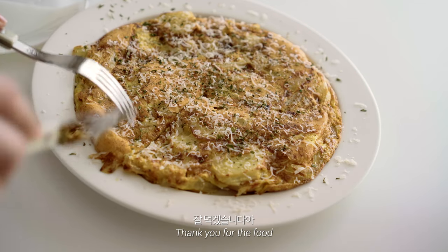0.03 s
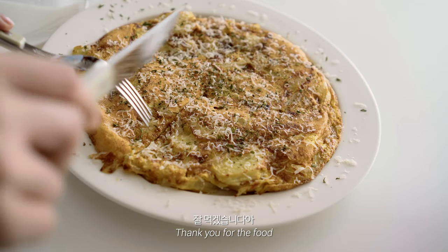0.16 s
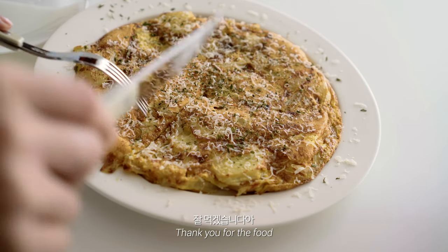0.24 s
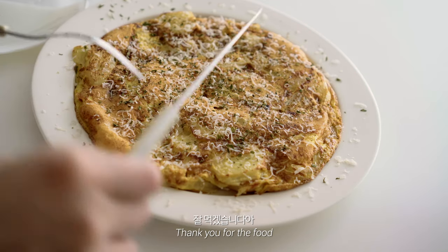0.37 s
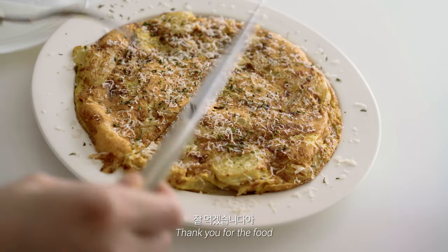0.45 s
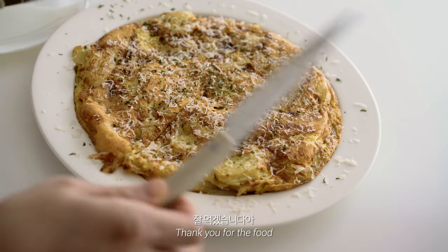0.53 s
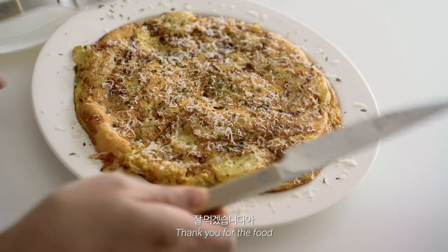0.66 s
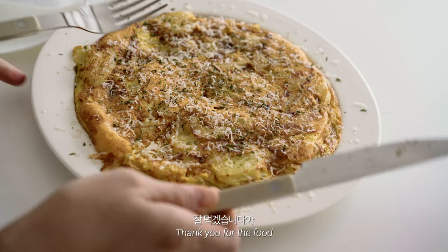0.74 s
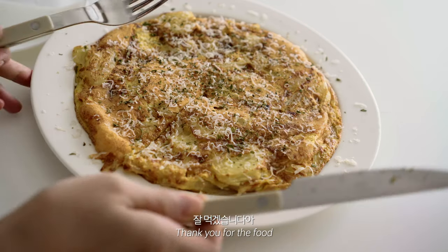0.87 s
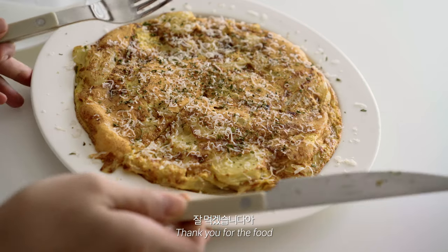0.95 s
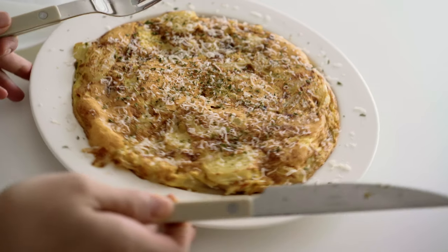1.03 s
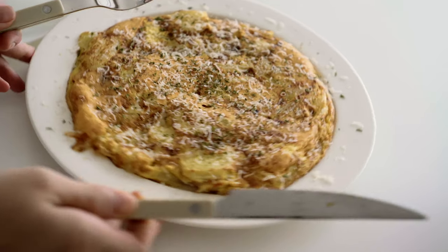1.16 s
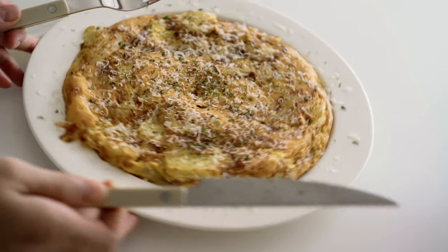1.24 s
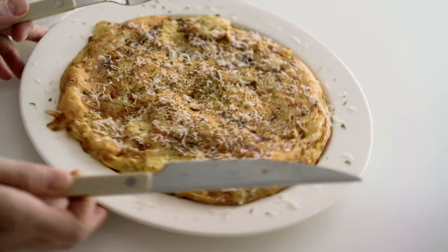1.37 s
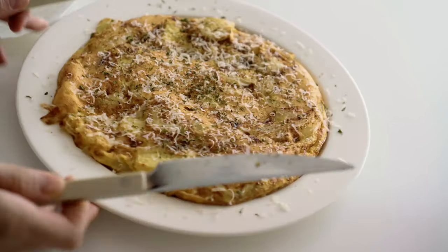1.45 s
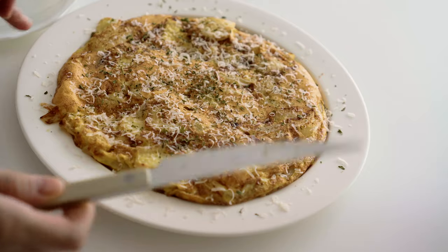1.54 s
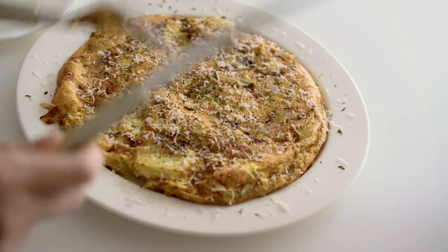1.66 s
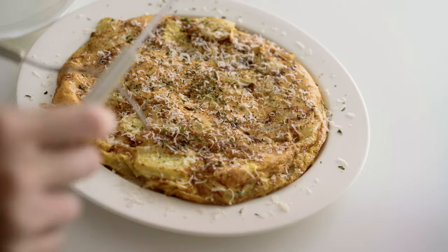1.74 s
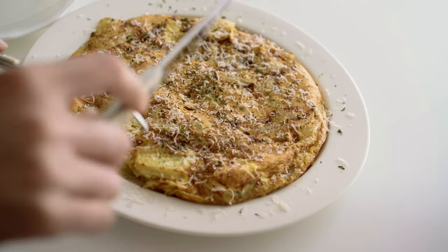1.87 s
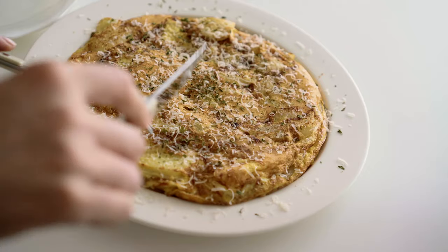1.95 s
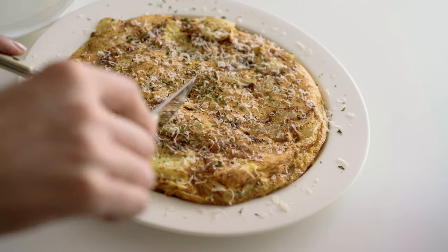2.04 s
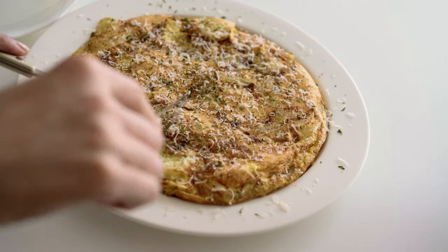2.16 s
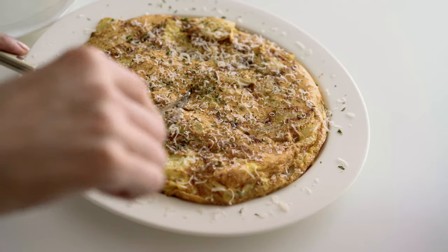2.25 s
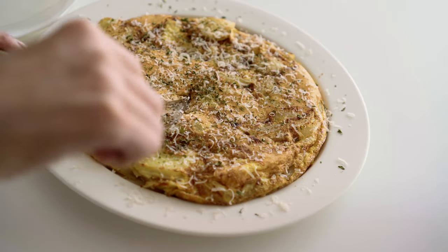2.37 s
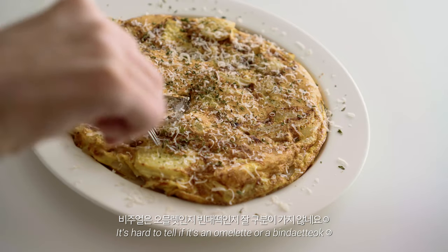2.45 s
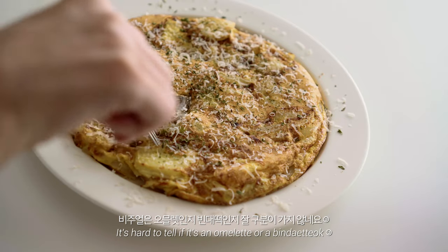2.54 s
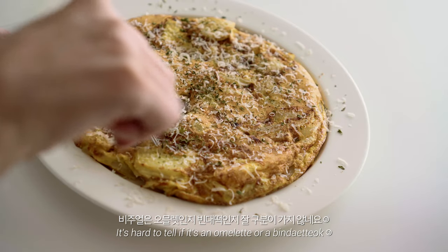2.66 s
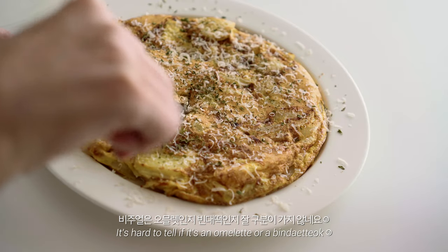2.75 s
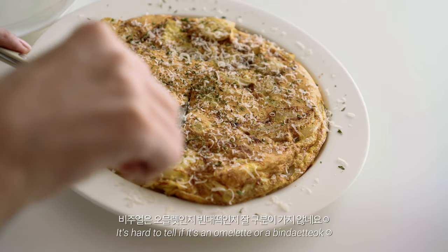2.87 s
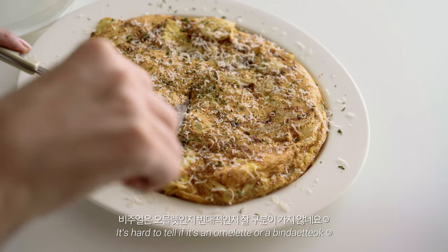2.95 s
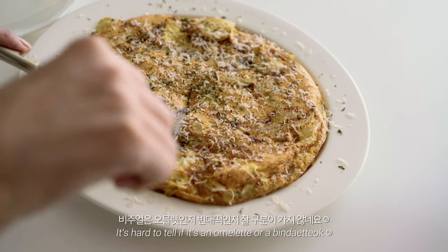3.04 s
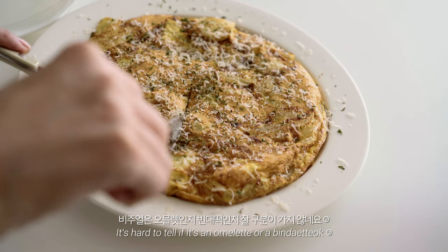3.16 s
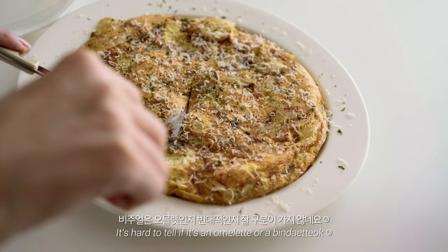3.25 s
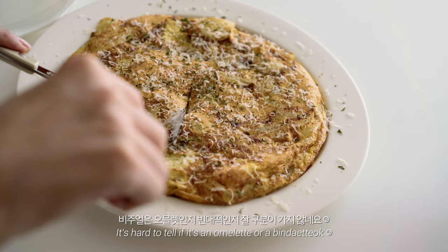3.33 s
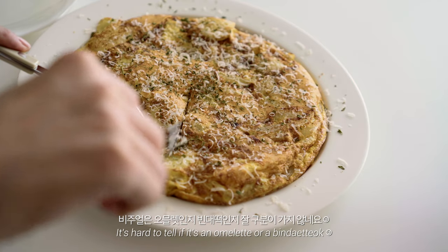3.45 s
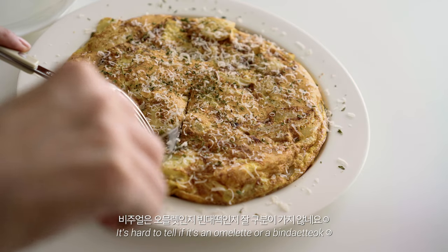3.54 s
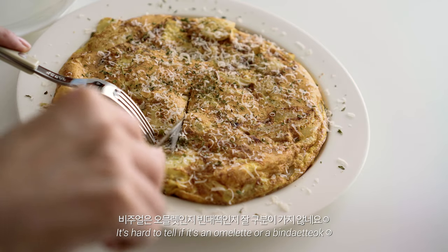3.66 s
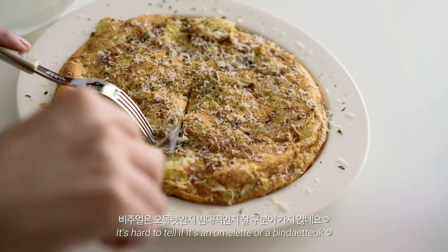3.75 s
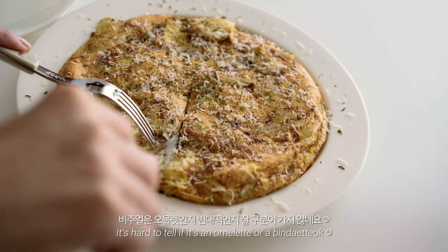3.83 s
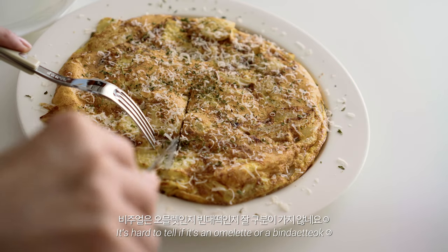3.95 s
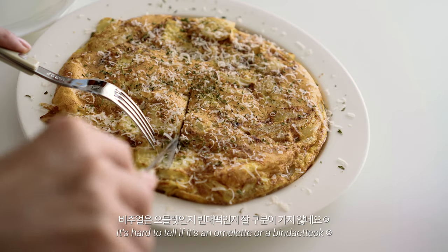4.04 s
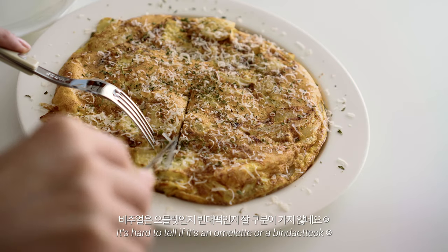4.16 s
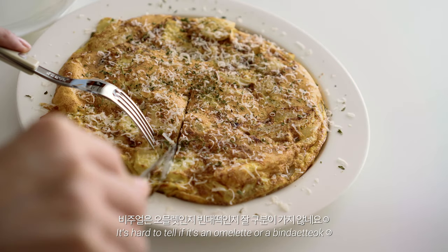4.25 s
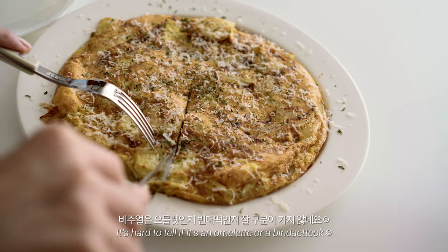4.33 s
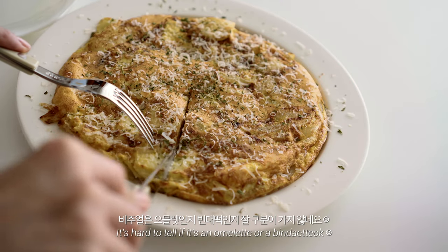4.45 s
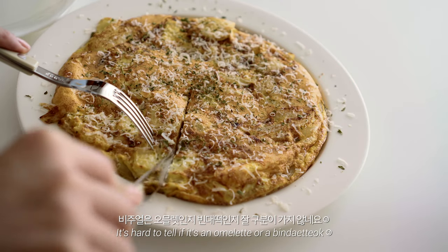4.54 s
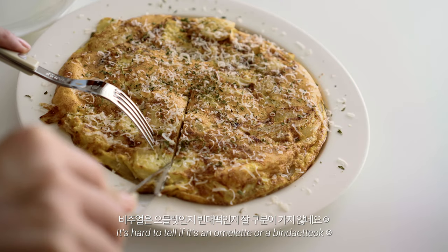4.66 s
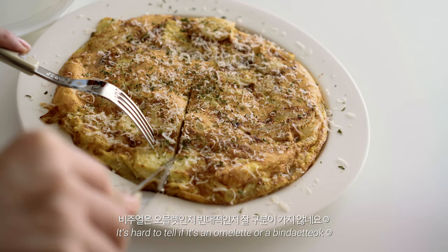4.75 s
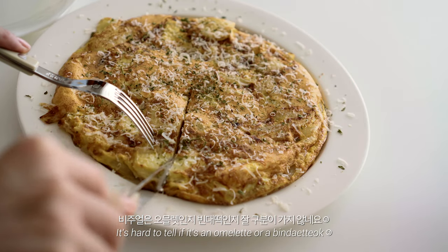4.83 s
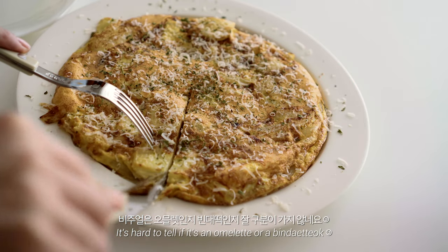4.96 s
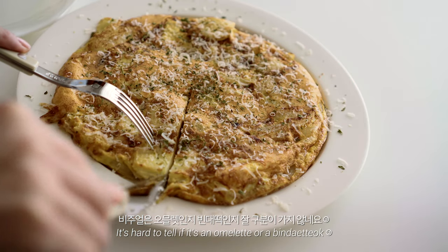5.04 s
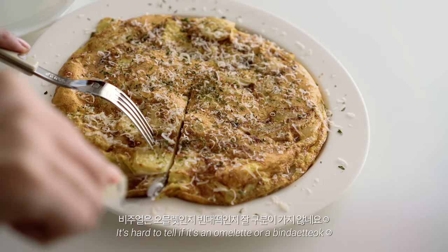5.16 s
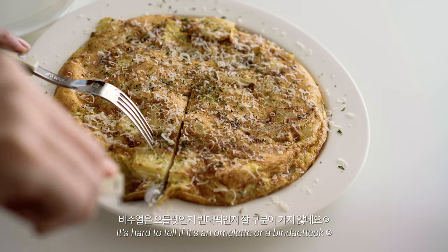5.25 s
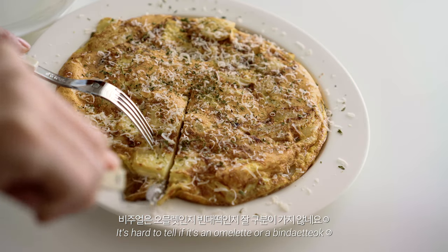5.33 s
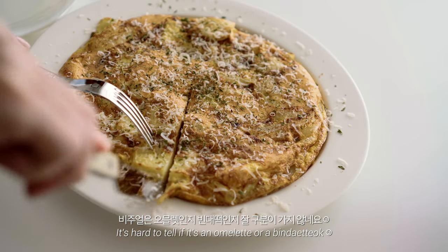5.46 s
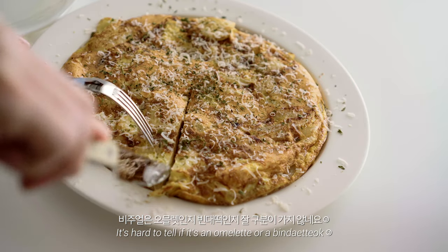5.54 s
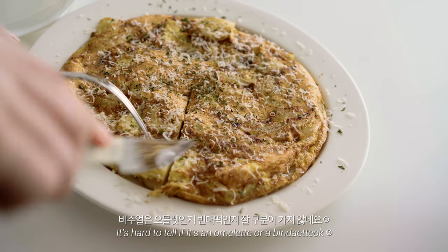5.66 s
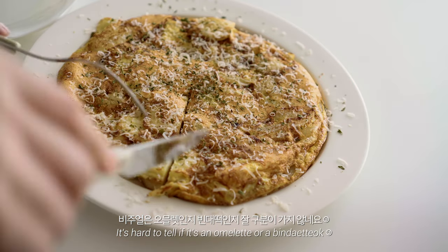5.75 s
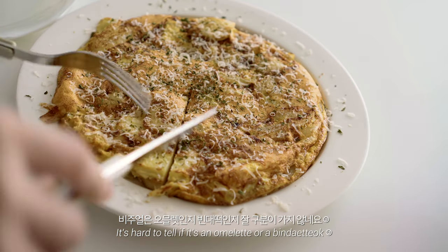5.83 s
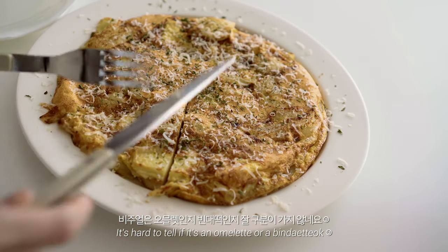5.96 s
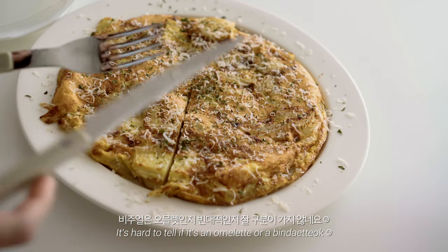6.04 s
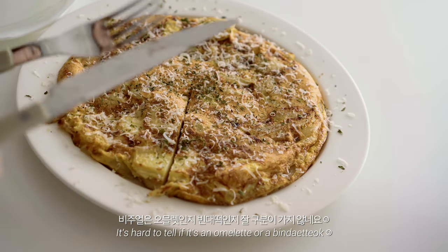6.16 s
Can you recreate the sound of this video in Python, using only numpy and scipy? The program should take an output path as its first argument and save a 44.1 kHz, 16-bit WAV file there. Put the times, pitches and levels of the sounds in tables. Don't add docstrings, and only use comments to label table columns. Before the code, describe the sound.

A steel knife saws through food on a china plate in short scraping strokes, after a dragging plate scrape, ending in bright clinks.

```python
import sys
import numpy as np
from scipy import signal
from scipy.fft import rfft, irfft
from scipy.io import wavfile
from scipy.ndimage import uniform_filter1d

SR = 44100
rng = np.random.default_rng(int(sys.argv[2]) if len(sys.argv) > 2 else 0)


def volts_from_decibels(level):
    exponent = np.asarray(level, float) / 20
    return 10 ** exponent


def waveform_to_disk(signal):
    frames = np.transpose(np.atleast_2d(signal))
    scaled = np.clip(frames, -1, 1) * 32767
    samples = np.round(scaled).astype(np.int16)
    wavfile.write(sys.argv[1], SR, samples)


N = 273420

# pitch_hz, level_db (per Hz)
HUSH = [(41, -19), (70, -18), (77, -6), (226, -5), (392, -9.5), (420, -3), (450, -9), (916, -12.5),
        (1130, -11), (1290, -11.5), (1870, -15), (15100, -14.5), (16900, -7)]
# pitch_hz, width_hz, level_db
HUM_BANDS = [(27.2, 20, -58), (54.5, 21, -60), (226, 18, -63), (434, 15, -70), (362.6, 14, -67),
             (1122, 48, -59.5), (13400, 4300, -51.5)]
# pitch_hz, likeness (0 to 1)
LIKENESS = [(30, 0.44), (100, 0.32), (400, 0.43), (1200, 0.32), (3000, 0.1), (6000, 0.017), (16000, 0.013)]
# start_s, peak_db, pitch_hz, width_hz, t60_s
CRACKS = [(0., -34.5, 716, 910, 0.31), (1.080, -26, 3160, 900, 0.02), (1.086, -31, 4930, 600, 0.018),
          (3.64, -29, 1500, 1500, .005), (3.81, -39, 9000, 8000, .006), (3.935, -40, 5500, 3040, .004),
          (4.945, -22.5, 2200, 500, .015), (5.262, -30, 2140, 400, 0.018),
          (2.591, -21.5, 1700, 700, 0.0096), (2.593, -19, 7500, 5000, .005),
          (2.592, -27, 4200, 1500, 0.012), (2.594, -35.5, 139, 79.4, 0.16), (2.593, -30.5, 420, 304, .1),
          (2.941, -23, 1730, 710, 0.0076), (2.938, -17.5, 9000, 9000, 0.0044), (2.939, -50, 140, 80, .12),
          (3.046, -34, 1590, 500, 0.023), (3.061, -35, 2880, 900, .006), (3.281, -20.5, 1620, 900, 0.0095),
          (3.282, -12.5, 7000, 12000, 0.005), (3.284, -48, 169, 80, 0.085), (3.41, -31.5, 1500, 500, 0.057),
          (3.655, -20.5, 1360, 910, 0.025), (3.652, -14, 7950, 12000, 0.012), (3.655, -41, 140, 80, 0.084),
          (3.654, -31.5, 370, 300, 0.31), (3.805, -37, 3740, 397, 0.044), (3.791, -33, 1460, 500, 0.028),
          (3.903, -25, 4870, 2500, 0.0051), (3.908, -30, 10000, 3000, .004),
          (4.102, -27, 8000, 6000, 0.0054), (4.101, -29, 1530, 800, .012), (4.205, -37.5, 1320, 300, 0.025),
          (4.418, -23, 7500, 6000, 0.0067), (4.419, -35.5, 205, 81, 0.13),
          (4.746, -16.5, 5900, 10000, 0.0075), (5.098, -33, 6000, 8000, .006),
          (5.303, -28, 8900, 6000, 0.0087), (5.311, -27, 11000, 3000, .006),
          (5.3254, -6, 2600, 714, 0.0095), (5.326, -22.5, 577, 690, 0.048), (5.325, -23, 9000, 7960, .008),
          (5.385, -36, 7300, 1500, .012), (5.385, -32, 790, 900, 0.034), (5.444, -17, 2450, 900, 0.014),
          (5.444, -31.5, 684, 900, 0.042), (5.492, -37, 6000, 5000, .005),
          (5.524, -20.5, 1600, 1200, 0.0098), (5.529, -29.5, 10200, 2000, 0.0096),
          (5.549, -32, 1500, 1210, .015), (5.548, -32, 590, 700, 0.056)]
# start_s, peak_db, scrape_db
FADING_CLINK = (0., -29.5, -2)
# pitch_hz, level_db, t60_s
FADING_TONES = [(2551, -1, 0.089), (2620, -4, 0.1), (1520, -2, 0.081), (3500, -11, 0.11), (1880, -2, 0.058),
                (2300, -8, .05)]
# start_s, low_db, 2khz_db, 4khz_db, 8khz_db
DRAGS = [
    [(1.04, -50.5, -56, -69, -64), (1.126, -37.5, -41, -54, -61), (1.246, -42, -37, -55, -56),
     (1.296, -46, -38.5, -46, -52), (1.348, -41, -37.5, -46.5, -52), (1.478, -47, -42.5, -56, -60),
     (1.56, -58, -58, -74, -73)],
    [(5.25, -62, -61, -59, -69), (5.328, -44.5, -47, -58, -53), (5.428, -46.5, -60, -71, -74),
     (5.466, -46.5, -51, -63, -64), (5.558, -45.5, -73, -74, -57), (5.64, -59, -55, -67, -71)],
]
# pitch_hz, level_db (per Hz)
TABLE_RUMBLE = [(59, -47), (100, -17.5), (473, 0.5), (611, -6.5), (820, -5), (1990, -4.5), (2470, -6.5),
                (2780, -12), (3590, -2), (4200, -13.5), (11000, -21), (14300, -55), (22000, -120)]
# pitch_hz, level_db, t60_s
HELD_PLATE = [
    [(2525, 1, 0.056), (3060, -5, .06), (1380, -11.5, 0.064)],
    [(911, -1.5, 0.037), (818, 10.5, 0.031), (550, -3, .05), (369, 2.5, 0.066), (212, -0.5, 0.058)],
    [(3620, 3, 0.079), (4920, -2.5, 0.055), (3500, -4, 0.079)],
    [(6200, 0, 0.033), (7280, -4, .03), (9170, -2, .02)],
]
# start_s, peak_db of each held plate group (four columns), scrape_db
JOLTS = [
    (1.0859, -17, -26, -30, -33, -25),
    (1.134, -39, -24, -41, -48, -25),
    (1.1722, -21, -32, -34, -51, -20),
    (1.2038, -37, -22.5, -44, -53, -25),
    (1.2299, -24, -21, -30.5, -46, -25),
]
# start_s, length_s, level_db of the first four rim groups and the squeal (five columns)
GLINTS = [
    (1.25, .03, -65, -60, -52, -75, -44),
    (1.32, 0.027, -35, -52, -43.5, -75, -45),
    (1.39, 0.024, -48, -60, -43, -75, -70),
    (1.435, 0.049, -51, -58, -44, -75, -70),
    (5.6, .03, -44, -47, -70, -70, -75),
    (5.68, .08, -58, -58, -75, -75, -75),
]
# pitch_hz, level_db, t60_s
SQUEAL = [(8350, 0, 0.046), (7140, -7, .04)]
# pitch_hz, level_db, t60_s
RIM = [
    [(2406, 0, .05), (2418, -17, .2)],
    [(2515, 0, .1), (2611, -1, .12), (1464, -2, .15), (1740, -12, .05)],
    [(3515, 0, .11)],
    [(4686, 0, .12)],
    [(5852, 0, .1), (7017, -1, .11), (8215, -1, .1), (9760, -6, .04), (11170, -10, .03)],
]
# start_s, peak_db of each rim group (five columns)
CLINKS = [
    (1.5763, -42, -48, -45, -61, -52),
    (5.3248, -23, -26, -27, -32, -31.5),
    (5.3857, -29.5, -39, -43, -39, -50),
    (5.444, -28.5, -36, -35, -32, -49),
    (5.4924, -27.5, -36, -34.5, -35, -47),
    (5.5234, -34, -32, -26, -51, -39),
    (5.5278, -14.5, -18, -30, -37, -42),
    (5.5488, -13, -40, -32, -26, -31),
]
# pitch_hz, level_db, t60_s
BLADE = [
    [(2042, 0, .05), (2240, -1, .055), (2140, -4, .05), (2350, -7, .04), (1900, -14, .025)],
    [(370, -8, .05), (424, -3, .08), (540, -7, .05), (650, -3, .06), (730, -1, .07), (775, -1, .06),
     (850, -6, .05)],
    [(4512, 0, .05), (4655, 0, .055), (5300, -18, .015)],
    [(7844, -2, .04), (7756, -5, .035), (7150, -3, .014), (7400, -4, .014), (9100, -14, .015),
     (11600, -12, .015)],
]
# start_s, 2khz_db, low_db, 4khz_db, 8khz_db (peaks), scrape_db
PUSHES = [
    (2.593, -28, -23.5, -37, -31, -9.5),
    (2.939, -27, -22, -35, -20, -8),
    (3.281, -20.5, -19, -23, -19, -10),
    (3.654, -12, -19, -13.5, -14, -14.5),
    (4.101, -21, -24.5, -28.5, -27, -14),
    (4.418, -18.5, -25.5, -29, -22, -12.5),
    (4.746, -18.5, -24, -38, -19, -12),
    (5.098, -26.5, -31, -27.5, -40, -13),
]
# start_s, length_s, 2khz_db, low_db, 4khz_db, 8khz_db
PULLS = [(2.673, 0.016, -47.5, -46, -62, -62), (3.045, 0.03, -45.5, -48.5, -55, -49),
         (3.415, 0.054, -45.5, -50.5, -52, -53), (3.802, 0.046, -33, -48, -39.5, -41.5),
         (3.864, 0.082, -51, -52, -64, -62), (4.2, 0.054, -43.5, -45, -50, -60),
         (4.586, 0.048, -39, -45, -52, -53), (4.807, 0.1, -45, -44, -57, -64),
         (4.925, 0.036, -42, -44, -56, -50), (4.951, 0.029, -35.5, -45, -45.5, -38),
         (5.014, .06, -47.5, -77.5, -67, -64), (5.267, 0.037, -38.5, -45, -42.5, -44.5),
         (5.307, 0.024, -29.5, -41.5, -35, -36)]


def evened(x):
    return x / np.sqrt(np.mean(x ** 2) + 1e-20)


def read(points, hz):
    f, value = np.transpose(points)
    return np.interp(np.log(hz + 1), np.log(f + 1), value)


def add(mix, s, sound):
    part = mix[..., round(s * SR):][..., :sound.shape[-1]]
    part += sound[..., :part.shape[-1]]


def ring(modes):
    t = np.arange(SR // 6) / SR
    out = 0
    for hz, db, t60 in modes:
        out = out + volts_from_decibels(db - 60 * t / t60) * np.sin(2 * np.pi * hz * t)
    return out / abs(out).max()


def grit(count, per_s, spread_db):
    size = volts_from_decibels(spread_db * np.minimum(rng.exponential(1, count), 4))
    size = size * rng.choice([-1., 1.], count)
    happens = rng.random(count) < per_s / SR
    return evened(size * happens)


def blows(rows, modes, contact_s, scrape_t60):
    force, t = np.zeros((len(modes), N)), np.arange(SR // 4) / SR
    for s, *group_db, scrape_db in rows:
        chatter = 0.16 * rng.standard_normal(len(t)) * np.exp(-t / contact_s)
        chatter[0] = 1
        scrape = volts_from_decibels(scrape_db - 24 - 60 * t / scrape_t60) * grit(len(t), 8000, 2.5)
        add(force, s, volts_from_decibels(np.array(group_db))[:, None] * (chatter + scrape))
    return sum(signal.oaconvolve(f, ring(m))[:N] for f, m in zip(force, modes))


def rubbed(level, modes, per_s, spread_db):
    ticks = grit(N, per_s, spread_db)
    out = np.zeros(N)
    for group_level, group in zip(level, modes):
        answer = ring(group)
        out += signal.oaconvolve(group_level * ticks, answer / np.linalg.norm(answer))[:N]
    return out


def brushes(rows, modes):
    t, level = np.arange(N) / SR, np.zeros((len(modes), N))
    for s, length, *group_db in rows:
        swell = np.exp(-8 * ((t - s) / length) ** 2)
        level += volts_from_decibels(np.array(group_db))[:, None] * swell
    return rubbed(level, modes, 5000, 2.6)


def kitchen():
    hush_db, edge_hz = -45, 16000
    frames, hz = N // 1024 + 5, np.fft.rfftfreq(4096, 1 / SR)
    a, b, c, d = rng.standard_normal((frames, len(hz), 4)).T
    same = np.clip(read(LIKENESS, hz), -1, 1)[:, None]
    left = a + 1j * b
    right = same * left + np.sqrt(1 - same ** 2) * (c + 1j * d)
    power = volts_from_decibels(2 * read(HUSH, hz)) * (hz < edge_hz)
    power = volts_from_decibels(2 * hush_db) * power / power.sum()
    for f, width_hz, db in HUM_BANDS:
        band = np.exp(-4 * ((hz - f) / width_hz) ** 2) * (hz < edge_hz)
        power = power + volts_from_decibels(2 * db) * band / band.sum()
    lean = volts_from_decibels(np.array([-1.2, 1.2])[:, None] / (1 + hz / 500))
    spectrum = np.array([left, right]) * (lean * np.sqrt(power))[..., None]
    out = signal.istft(spectrum, nperseg=4096, noverlap=3072)[1][:, :N]
    return evened(out) * np.sqrt(power.sum())


def throb():
    drift = uniform_filter1d(rng.standard_normal((2, N)), 6000)
    drift = evened(uniform_filter1d(drift, 6000))
    turns = np.cumsum(53 + 2.9 * drift[0]) / SR
    tone = np.sin(2 * np.pi * turns - np.array([[0], [.8]]))
    return volts_from_decibels(-55 + 2.8 * drift[1] + np.array([[-1.5], [1.5]])) * tone


def cracks():
    out, t = np.zeros(N), np.arange(SR // 6) / SR
    for s, db, hz, width_hz, t60 in CRACKS:
        pole = np.exp((2j * hz - width_hz) * np.pi / SR)
        shape = volts_from_decibels(-60 * t / t60) * np.minimum(t / min(t60 / 8, .006), 1)
        noise = shape * rng.standard_normal(len(t)) + 0j
        burst = signal.lfilter([1], np.poly([pole, pole]), noise).real
        if hz > 1000:
            burst = np.diff(burst, prepend=0)
        add(out, s, volts_from_decibels(db) * burst / abs(burst).max())
    return out


def fading_clink():
    return blows([FADING_CLINK], [FADING_TONES], .002, 0.43)


def drags():
    t, level = np.arange(N) / SR, np.zeros((4, N))
    for rows in DRAGS:
        s, low, mid, high, top = np.transpose(rows)
        level += [volts_from_decibels(np.interp(t, s, db, -120, -120)) for db in (mid, low, high, top)]
    level *= volts_from_decibels(2.45 * evened(uniform_filter1d(rng.standard_normal(N), 500)))
    hz = np.fft.rfftfreq(N, 1 / SR)
    rumble = rfft(grit(N, 12000, 1.6)) * volts_from_decibels(read(TABLE_RUMBLE, hz))
    bands_hz = (1100, 3250), (0, 1100), (3250, 5350), (5350, 12000)
    parts = [evened(irfft(rumble * (hz >= a) * (hz < b), N)) for a, b in bands_hz]
    broad_db = np.array([-1.3, 1.5, 1.2, 3.0])[:, None]
    tonal_db = np.array([-9.5, 0.5, -5.0, -10.0])[:, None]
    broad = (level * volts_from_decibels(broad_db) * parts).sum(0)
    return broad + rubbed(level * volts_from_decibels(tonal_db), HELD_PLATE, 8000, 2.9)


def jolts():
    return blows(JOLTS, HELD_PLATE, 0.00093, 0.097)


def singing_rim():
    return brushes(GLINTS, RIM[:4] + [SQUEAL])


def clinks():
    rows = [(*row, -24.) for row in CLINKS]
    return blows(rows, RIM, 0.00035, .06)


def pushes():
    return blows(PUSHES, BLADE, 0.00065, 0.37)


def pulls():
    return brushes(PULLS, BLADE)


def room(x, t60):
    taps = np.zeros((2, SR // 2))
    at = np.arange(120, SR // 2 - 20, 20)
    at = at + rng.integers(0, 20, (2, len(at)))
    np.put_along_axis(taps, at, rng.choice([-1., 1.], at.shape), 1)
    hz, t, z = signal.stft(taps, SR, nperseg=256)
    fade = volts_from_decibels(-60 * t / read(t60, hz)[:, None])
    tail = signal.istft(z * fade, SR, nperseg=256)[1]
    return signal.fftconvolve(x[None], tail / np.linalg.norm(tail[0]), axes=1)[:, :N]


def scene():
    near = cracks() + fading_clink() + drags() + jolts() + singing_rim()
    near = near + clinks() + pushes() + pulls()
    no_bass = signal.butter(3, 125, "high", fs=SR, output="sos")
    near = signal.sosfilt(no_bass, near)
    direct = np.array([np.roll(near, 1), near])
    direct = direct * volts_from_decibels(np.array([[-.2], [.2]]))
    echo = volts_from_decibels(-15.5) * room(near, [(200, 0.58), (2000, 0.28), (10000, 0.05)])
    return direct + echo + kitchen() + throb()


def roll_off(x):
    return signal.sosfilt(signal.butter(12, 17070, fs=SR, output="sos"), x)


def record(dry):
    return roll_off(dry)


dry = scene()
out = record(dry)
waveform_to_disk(out)
```